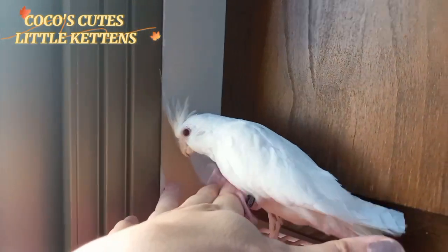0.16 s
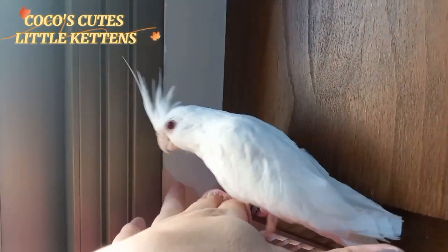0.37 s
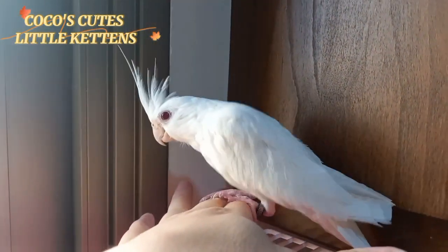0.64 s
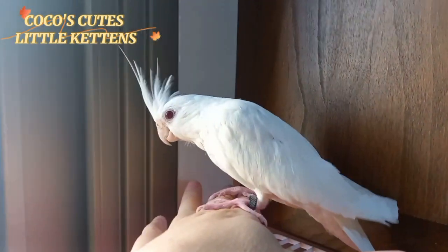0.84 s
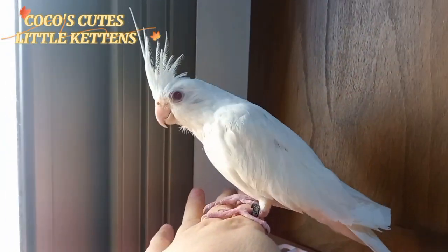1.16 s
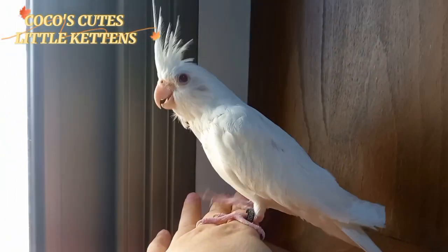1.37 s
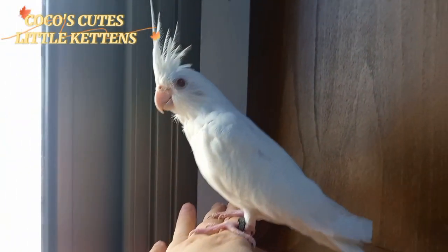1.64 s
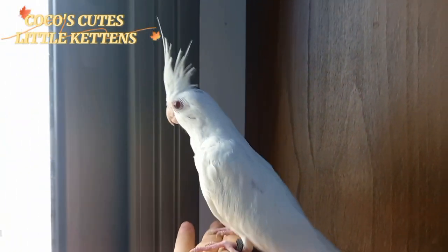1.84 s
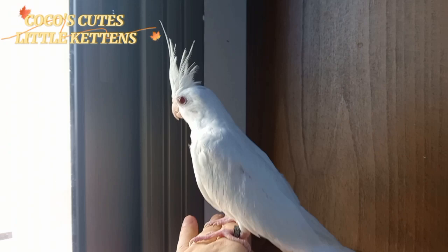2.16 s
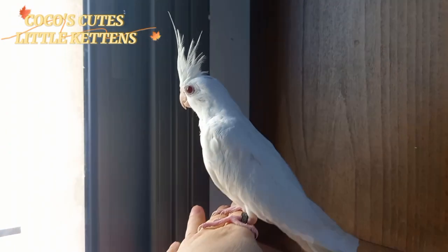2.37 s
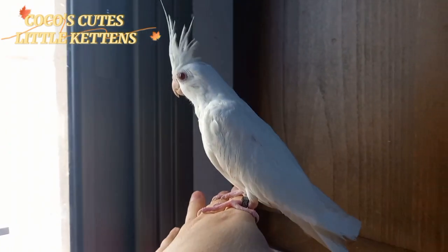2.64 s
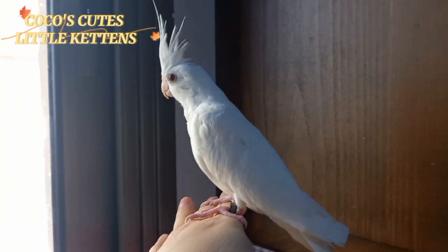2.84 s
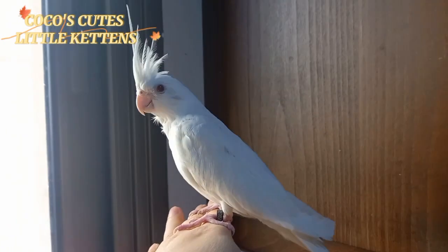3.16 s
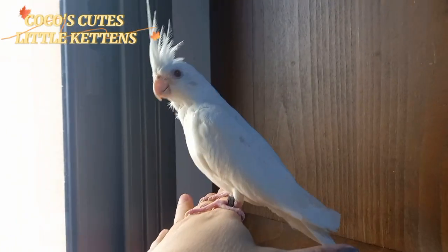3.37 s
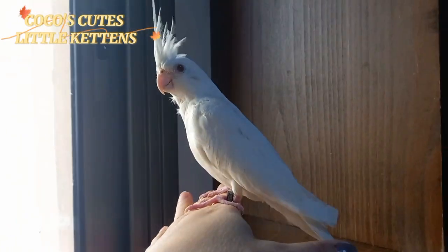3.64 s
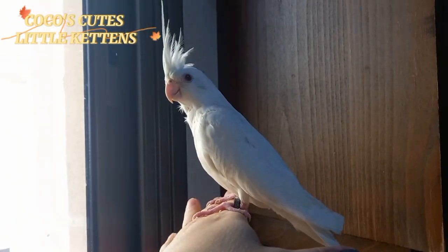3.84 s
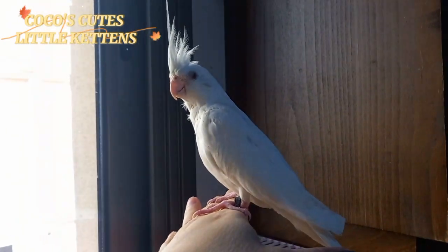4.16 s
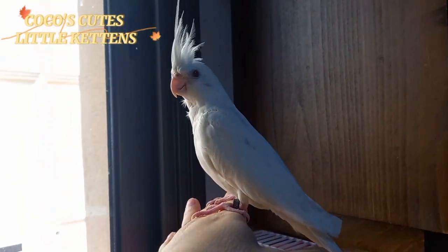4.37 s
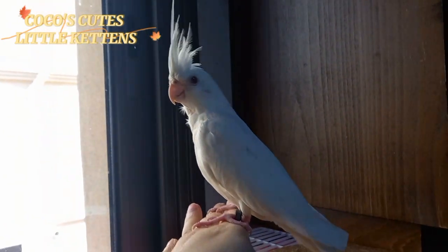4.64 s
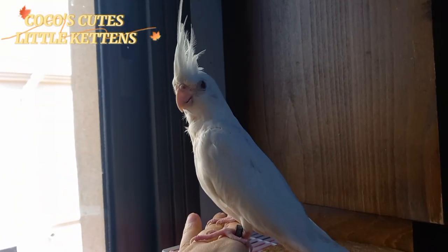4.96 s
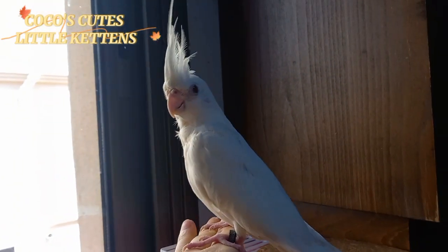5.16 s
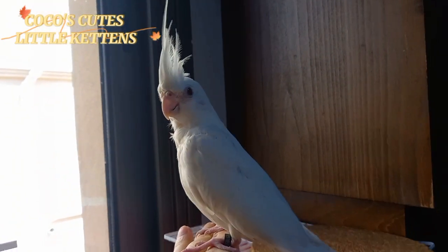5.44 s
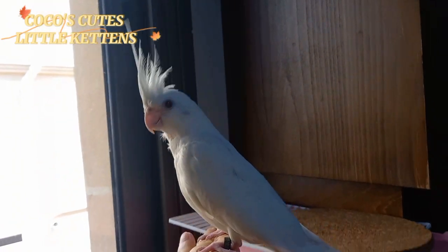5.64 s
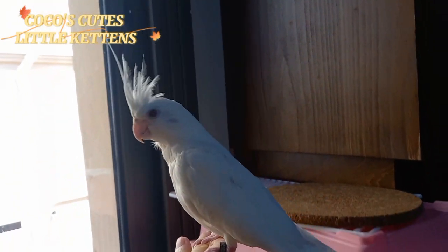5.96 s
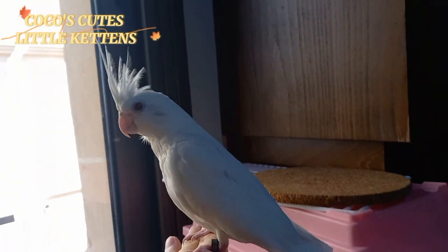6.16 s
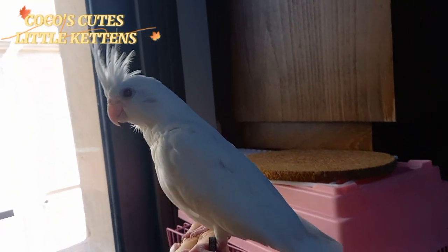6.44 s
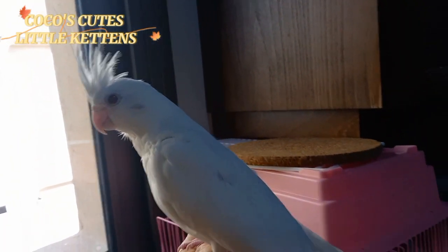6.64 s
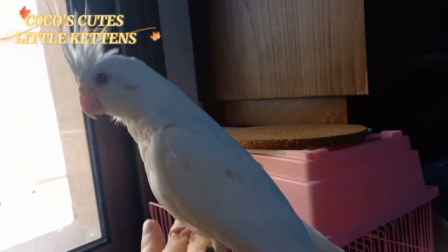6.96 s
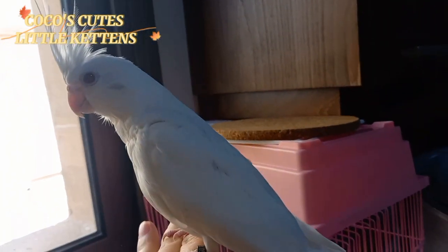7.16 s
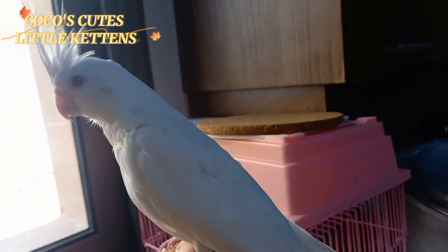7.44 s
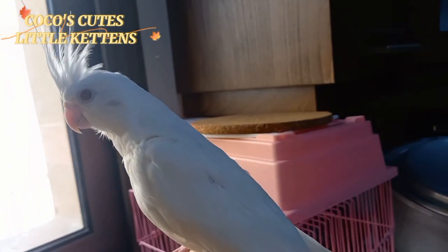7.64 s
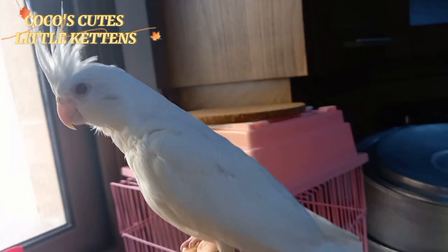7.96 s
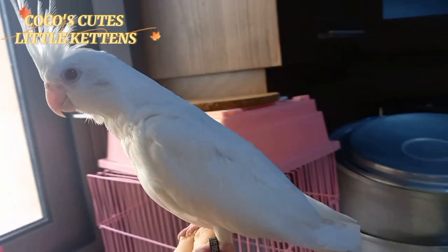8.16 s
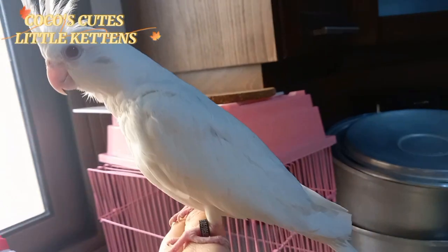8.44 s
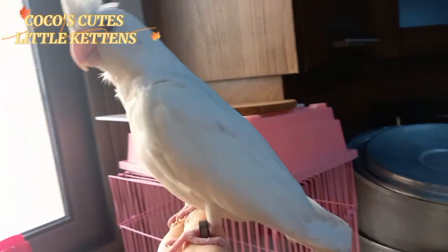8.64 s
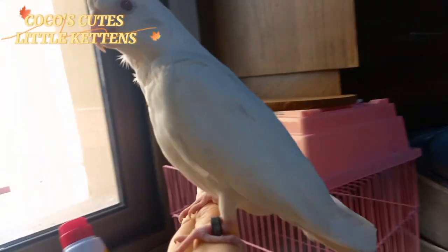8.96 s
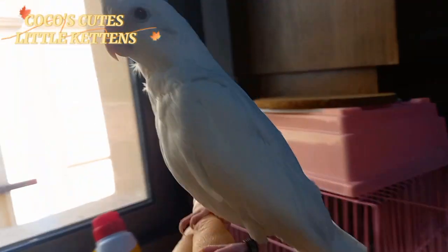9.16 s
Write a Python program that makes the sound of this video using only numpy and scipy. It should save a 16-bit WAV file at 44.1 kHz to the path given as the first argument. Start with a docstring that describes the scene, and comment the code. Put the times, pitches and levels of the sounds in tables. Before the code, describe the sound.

Indoors by a window, low rumble and broad muffled town noise run steadily with a faint high electric whine. After a few tiny dry ticks, a close cockatiel gives one loud hoarse whistle, gliding up then dropping. A farther bird answers at once and keeps calling alone, about one short whistle per second at first, then sparser, each with an echoing tail. Phone microphone; background swells back in quiet gaps.

```python
"""Two pet parrots in a hard-walled room

One parrot calls once, close to a phone; another, far off and mostly heard by way of the walls, answers.
Each whistle is a gliding tone with hoarse overtones, shaped by the throat and given an echoing tail of noise.
Town rumble (noise) rings the low room modes, under broad town noise, a thin electric whine and faint ticks.
The phone's gain control ducks under loud sound, creeps back, and climbs faster after a longer quiet."""
import sys
import numpy as np
from scipy import signal
from scipy.fft import rfft, irfft, next_fast_len
from scipy.io import wavfile
from scipy.ndimage import uniform_filter1d, minimum_filter1d, map_coordinates

SR = 44100
rng = np.random.default_rng(int(sys.argv[2]) if len(sys.argv) > 2 else 0)


def int16_out(signal):
    """Quantize to a 16-bit WAV file."""
    q = np.round(np.clip(np.atleast_2d(signal).T, -1, 1) * 32767)
    wavfile.write(sys.argv[1], SR, q.astype(np.int16))


N = 410130
TOP_HZ = 15850  # band limit of the phone
LONGEST = SR // 3  # most samples in one whistle


def amp(db):
    """dB to gain."""
    return 10 ** (np.asarray(db) / 20)


def unit(x):
    """Scaled to rms 1."""
    return x / np.sqrt(np.mean(x ** 2) + 1e-20)


def along(points, hz):
    """Values at hz, read between (Hz, value) points on a log axis."""
    f, v = np.transpose(points)
    return np.interp(np.log(hz + 1), np.log(f + 1), v)


def wobble(rate, size=N):
    """A smooth random curve through rate knots a second."""
    knots = rng.standard_normal(int(size * rate / SR) + 4)
    return map_coordinates(knots, [np.arange(size) * rate / SR])


def filtered(x, response):
    """x with its spectrum times a response of frequency."""
    m = next_fast_len(x.shape[-1] + 8192)
    spectrum = rfft(x, m) * response(np.fft.rfftfreq(m, 1 / SR))
    return irfft(spectrum, m)[..., :x.shape[-1]]


def add(into, s, x):
    """Mixes x in from time s, in seconds."""
    part = into[:, round(s * SR):][:, :x.shape[1]]
    part += x[:, :part.shape[1]]


def rush(gain):
    """Stereo noise of rms 1: a shared middle and a difference set how alike the ports sound at each pitch."""
    # likeness of the two ports: freq_hz, correlation (-1 to 1)
    likeness = [(60, 1), (130, 0.88), (290, 0.87), (640, 0.53), (1410, -0.19), (3100, 0.021), (6820, -0.14),
                (15000, 0.11)]
    # balance of the two ports: freq_hz, left_minus_right_db
    balance = [(60, 2.5), (110, 3), (200, 1), (380, .5), (700, .5), (1290, -2), (2380, -5), (4400, -3.5),
               (8120, -4), (15000, 0)]

    def mid_side(hz):
        turn = np.arccos(np.clip(along(likeness, hz), -1, 1)) / 2
        return gain(hz) * [np.cos(turn), np.sin(turn)]

    mid, side = filtered(rng.standard_normal((2, N)), mid_side)
    ports = np.array([mid + side, mid - side])
    return unit(filtered(ports, lambda hz: amp(np.outer([.5, -.5], along(balance, hz)))))


def rumble():
    """Low noise rings the room's modes; which ones are strong depends on where the phone is."""
    # path of the phone and loudness of the rumble: time_s, level_db, way into the room (0-1)
    path = [(0, -42.5, 0.4), (1.2, -40.5, 0.11), (2, -43.5, 0.22), (4.5, -43, 0.85), (5.3, -42, 0.98),
            (7.5, -41.5, 0.93), (8.2, -44.5, 0.97), (9.3, -37, 1)]
    # low room modes heard by the window: freq_hz, width_hz, relative_db
    modes_window = [(55, 21, -16), (99, 19, -6.5), (119.7, 18.6, -6.5), (149.6, 14.3, 1.5),
                    (206.3, 7.8, -2), (270, 29, -10.5), (302, 44, -12), (410, 75, -17.5), (460.5, 9.9, -7)]
    # low room modes heard further in: freq_hz, width_hz, relative_db
    modes_inside = [(57, 44, -20.5), (105.04, 6.4, 1.5), (129.6, 7.5, -7.5), (154, 11.7, -11.5),
                    (214.7, 28, -16.5), (258, 31.5, -11), (313.7, 39, -11.5), (369, 45, -16.5),
                    (465, 98, -22)]

    def ringing(modes):
        def gain(f):
            power = sum((amp(db) * (f * w) ** 2 / ((c * c - f * f) ** 2 + (f * w) ** 2)) ** 2
                        for c, w, db in modes)
            low_cut = 1 + (49 / (f + 1)) ** 16
            high_cut = 1 + (f / 520) ** 4
            return np.sqrt(power) / low_cut / high_cut
        return rush(gain)

    s, level_db, way = np.transpose(path)
    t = np.arange(N) / SR
    way = np.clip(np.interp(t, s, way), 0, 1)
    mix = np.sqrt(1 - way) * ringing(modes_window) + np.sqrt(way) * ringing(modes_inside)
    return amp(np.interp(t, s, level_db) + wobble(3.415)) * mix


def town_noise():
    """Broad town noise, swelling slightly at a slow and a quicker pace."""
    # colour of the noise: freq_hz, relative_db (per Hz)
    colour = [(30, -25.5), (45, -32), (60, -14.5), (300, -13.5), (556, -17.5), (700, -14), (900, -17.5),
              (1250, -20), (2490, -19.5), (5000, -33), (8000, -36), (10000, -40), (13000, -48.5),
              (14000, -84)]
    swell_db = .8 * wobble(2) + .7 * wobble(18)
    return amp(-50.0 + swell_db) * rush(lambda hz: amp(along(colour, hz)))


def whine():
    """A narrow band of high noise, the thin electric whine, that flickers."""
    # shape of the band: freq_hz, relative_db (per Hz)
    band = [(14400, -60), (14750, -24), (14950, -7), (15130, 0), (15250, -12), (15500, -45), (15800, -70)]
    return amp(-66.0 + 0.5 * wobble(5)) * rush(lambda hz: amp(along(band, hz)))


def ticks():
    """Faint dry ticks: bursts of differenced, so bright, noise that die 60 dB in 22 ms."""
    # the ticks: start_s, level_db (of the noise before differencing)
    tick_list = [(.2264, -53), (.4179, -53.5), (.4738, -54), (.5621, -54.5), (.6634, -57.5)]
    out, t = np.zeros((2, N)), np.arange(SR // 50) / SR
    for s, db in tick_list:
        bright = np.diff(rng.standard_normal((2, len(t) + 1)))
        add(out, s, amp(db - 60 * t / 0.022) * bright)
    return out


def gesture(rise, hold, fall, first_hz, top_hz, held_hz, last_hz, step, step_hz,
            rise_db, top_db, fall_db, over_db, end_db):
    """Pitch climbs in steps, holds and drops; returns time, pitch and the levels of tone and overtones."""
    # the beak radiates low notes weakly: pitch_hz, gain_db
    low_notes = [(1500, -26), (1900, -11.5), (2100, -11), (2330, -4), (2700, -1)]
    rise_bend, fall_bend = 1.3, 1.4  # the rise slows into the top, the fall speeds up
    attack_s, attack_db = .013, -12  # onset time constant and depth
    rise_fade_db = -2  # overtones thin out on the way up

    t = np.arange(0, rise + hold + fall, 1 / SR)[:LONGEST]
    up = np.clip(t / rise, 0, 1)
    held = np.clip((t - rise) / hold, 0, 1)
    down = np.clip((t - (rise + hold)) / fall, 0, 1)

    steps = step_hz * np.sin(2 * np.pi * t / step) * (1 - up ** 3)
    climb = top_hz - (top_hz - first_hz) * (1 - up) ** rise_bend
    drop = (held_hz - last_hz) * down ** fall_bend
    pitch = climb + steps + (held_hz - top_hz) * held - drop

    onset_db = attack_db * np.exp(-t / attack_s)
    effort_s = [0.59 * rise, rise + hold / 2, rise + hold + fall / 2]
    effort_db = np.interp(t, effort_s, [rise_db, top_db, fall_db])
    tone_db = onset_db + effort_db + along(low_notes, pitch)
    overtone_db = onset_db + over_db + rise_fade_db * up + (end_db - over_db) * down
    return t, pitch, tone_db, overtone_db


def whistle(call, waver, flutter_db, hoarse, breath_db):
    """A gliding tone from the syrinx; the throat picks out overtones, hoarsest and breathiest at the start."""
    # throat resonance on the overtones: freq_hz, gain_db
    throat = [(3000, -15), (4000, -4), (4700, -14.5), (5400, -19.5), (6500, -26.5), (7500, -22),
              (9500, -28), (10500, -33.5), (12500, -20), (14000, -29.5), (15500, -24)]
    *shape, treble_db = call
    t, pitch, tone_db, over_db = gesture(*shape)

    def chance(rate):
        return wobble(rate, size=LONGEST)[:len(t)]

    def throat_db(f):
        return along(throat, f) + treble_db * np.clip((f - 7000) / 2000, 0, 1)

    hz = uniform_filter1d(pitch, 500, mode="nearest") * (1 + waver * chance(88.6))
    start = amp(-60 * t / .5)
    # cycle jitter smears high overtones most
    phase = 2 * np.pi * np.cumsum(hz) / SR + hoarse * (0.13 + start) * chance(700)

    over = 0
    for k in range(2, 9):
        level = amp(throat_db(k * hz) + 3.1 * chance(121.8))
        over = over + level * (k * hz < TOP_HZ) * np.sin(k * phase)
    breath = filtered(rng.standard_normal(LONGEST), lambda f: amp(throat_db(f)) * (f > 3600))[:len(t)]

    tone = amp(tone_db) * np.sin(phase) + amp(over_db) * (over + amp(breath_db) * start * breath)
    edges = np.minimum(1, np.minimum(t, t[-1] - t) / 0.0018)  # short fades against clicks
    return np.sqrt(2) * edges * amp(flutter_db * chance(65.73)) * tone


def room(x, early_db, early_s, build_s):
    """A fresh tail of the walls; each frequency dies at its own speed, after the echoes have built up."""
    # how long the walls ring: freq_hz, t60_s
    walls = [(1500, 0.56), (3000, 0.6), (4200, 0.53), (6000, 0.51), (10000, 0.4), (15000, 0.22)]
    hz, t, z = signal.stft(rng.standard_normal((2, SR)), SR, nperseg=256)
    decay = amp(-60 * t / along(walls, hz)[:, None])
    early = 1 + amp(early_db - 60 * t / early_s)
    build = 1 - 0.44 * np.exp(-t / build_s)
    tail = signal.istft(z * (decay * early * build), SR, nperseg=256)[1]
    tail = tail / np.linalg.norm(tail, axis=1, keepdims=True)
    late = np.pad(x, (130, 0))  # samples before the first echo
    return signal.fftconvolve(late[None], tail, axes=1)


def straight(x, lead):
    """The direct path to the two ports: sound reaches the left one first, by lead samples."""
    return np.array([np.pad(x, (0, lead)), np.pad(x, (lead, 0))])


def near_bird():
    """The close parrot, mostly straight sound with a weaker room behind it."""
    # its whistles: start_s, rise_s, hold_s, fall_s, first_pitch_hz, top_pitch_hz, pitch_after_hold_hz,
    # last_pitch_hz, step_length_s, step_depth_hz, rise_level_db, top_level_db, fall_level_db,
    # overtones_start_db, overtones_end_db (they sink towards it in the fall), treble_db (from 7 kHz, full at 9)
    calls = [(1.247, .118, .012, .07, 1803, 3260, 3310, 2140, .046, 120, -10, -19, -11, -13.5, -27, -1)]
    out = np.zeros((2, N))
    for s, *call in calls:
        x = whistle(call, waver=.012, flutter_db=3.5, hoarse=.24, breath_db=-9)
        add(out, s, straight(x, lead=36) * amp([[-.3], [.3]]))
        add(out, s, amp([[-7], [-4]]) * room(x, early_db=8, early_s=0.071, build_s=0.0032))
    return out


def far_bird():
    """The distant parrot, mostly room sound; it reaches the left port first but is louder in the right."""
    # its whistles: start_s, rise_s, hold_s, fall_s, first_pitch_hz, top_pitch_hz, pitch_after_hold_hz,
    # last_pitch_hz, step_length_s, step_depth_hz, rise_level_db, top_level_db, fall_level_db,
    # overtones_start_db, overtones_end_db (they sink towards it in the fall), treble_db (from 7 kHz, full at 9)
    calls = [ (1.486, 0.11, 0.04, .045, 1947, 3010, 2920, 1553, 0.066, 57.3, -17.5, -20.5, -24.5, -23, -50.5, -4.5),
             (2.122, 0.11, 0.061, 0.07, 1760, 3234, 3276, 1544, 0.0675, 30.2, -17, -25, -20, -22, -42.5, 0),
             (3.097, .11, 0.061, 0.075, 1832, 3287, 3269, 1553, 0.074, 40, -15, -22.5, -19.5, -21.5, -35, 1),
             (3.786, 0.12, 0.083, .05, 1608, 3228, 3305, 1603, 0.075, 40.3, -15.5, -17, -20.5, -20, -32, -1),
             (4.788, 0.14, 0.047, 0.068, 1736, 3280, 3199, 1740, .07, 30, -18, -18.5, -18, -21, -29.5, -5),
             (5.387, .135, .055, 0.067, 1600, 3192, 3240, 1673, 0.068, 15, -18, -20.5, -19.5, -18, -23.5, -9.5),
             (6.695, 0.12, .1, 0.029, 1790, 3347, 3194, 1847, 0.078, 58.5, -19, -12.5, -19.5, -18, -36.5, -1),
             (8.957, 0.13, 0.049, 0.044, 1938, 3050, 3038, 1775, .085, 88, -17.5, -20, -19.5, -25, -28, 3)]
    straight_db, left_minus_right_db = -10.5, -5  # straight path against room sound; balance
    sides = amp(np.array([[.5], [-.5]]) * left_minus_right_db)
    out = np.zeros((2, N))
    for s, *call in calls:
        x = whistle(call, waver=0.00845, flutter_db=4.5, hoarse=0.25, breath_db=-5.5)
        add(out, s, sides * amp(straight_db) * straight(x, lead=13))
        add(out, s, sides * room(x, early_db=3.5, early_s=1.0, build_s=0.019))
    return out


def scene():
    """All sources at the microphone, before its gain."""
    return rumble() + town_noise() + whine() + ticks() + near_bird() + far_bird()


def gain_control(x):
    """Loud sound turns the gain down; it creeps up, later climbs faster; a soft limiter rides the peaks."""
    full_db, held_db, loud_db = 21, -10.0, -9  # full gain, deepest slow cut, peak that counts as loud
    creep, rise, hold = 1.49, 16, 0.99  # dB/s, then dB/s after this many quiet seconds
    top_db, firm, release = -4, 0.92, 0.066  # limiter: threshold, share of the excess cut, seconds

    step = SR // 400
    dt = step / SR
    peak = -minimum_filter1d(-np.max(np.abs(x), 0), size=3 * step)[::step]
    slow, fast, quiet, gain_db = 0, 0, hold, []
    for peak_db in full_db + 20 * np.log10(peak + 1e-9):
        loud = peak_db + held_db > loud_db  # judged as if already held down
        quiet = 0 if loud else quiet + dt
        if loud:
            slow = max(held_db, slow - 1)
        else:
            slow = min(0, slow + dt * (creep if quiet < hold else rise))
        fast = min(firm * (top_db - peak_db - slow), fast * (1 - min(1, dt / release)))
        gain_db.append(slow + fast)
    gain_db = uniform_filter1d(gain_db, size=9)  # sluggish enough to let short peaks through
    return x * amp(full_db + np.interp(np.arange(N), np.arange(len(peak)) * step, gain_db))


def record(dry):
    """The phone: gain control, soft clipping, and nothing above the band limit."""
    x = gain_control(dry)
    x = x / (1 + np.abs(x) ** 8) ** (1 / 8)
    return filtered(x, lambda hz: hz < TOP_HZ)


dry = scene()
out = record(dry)
int16_out(out)
```